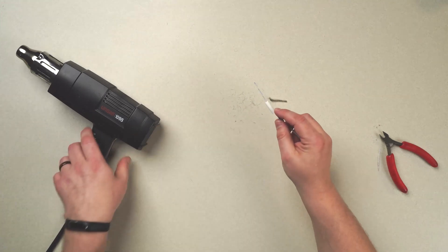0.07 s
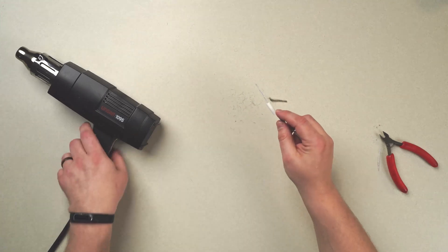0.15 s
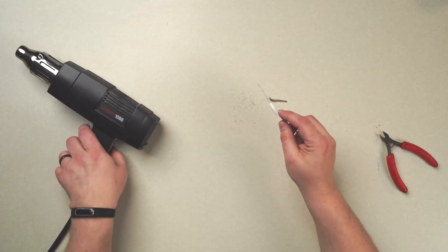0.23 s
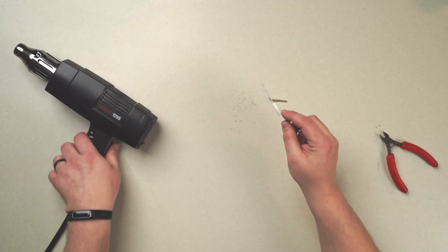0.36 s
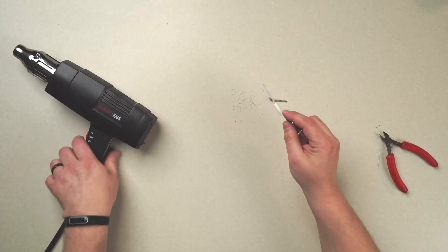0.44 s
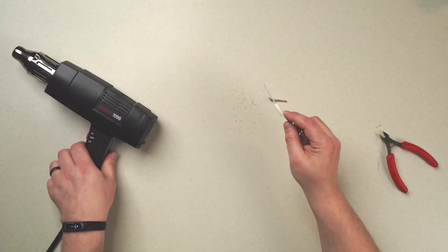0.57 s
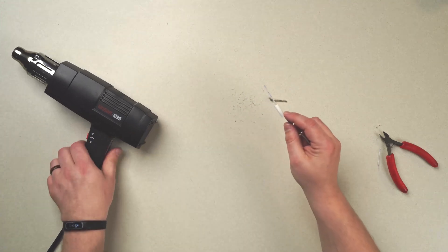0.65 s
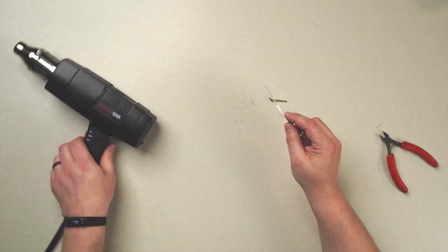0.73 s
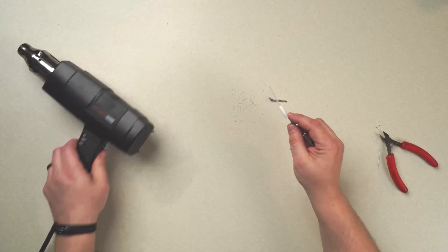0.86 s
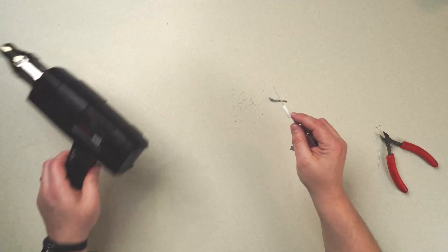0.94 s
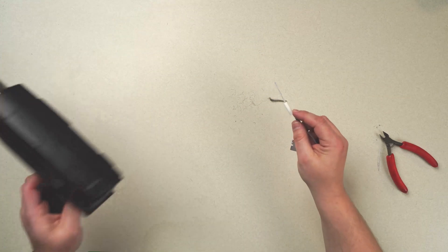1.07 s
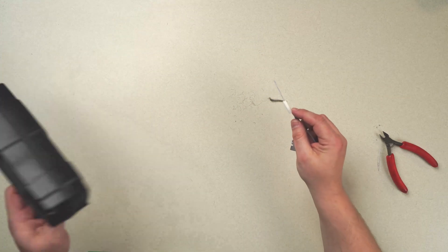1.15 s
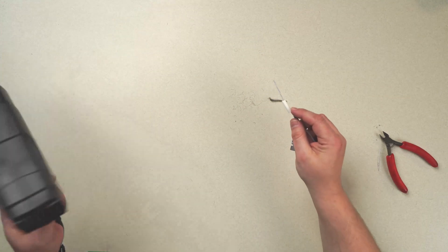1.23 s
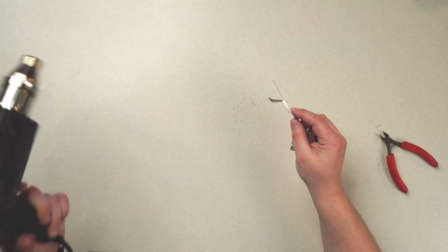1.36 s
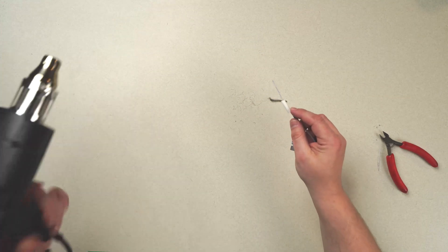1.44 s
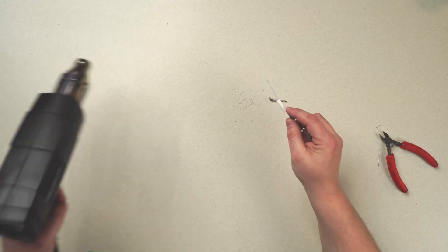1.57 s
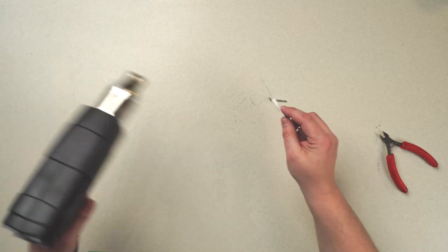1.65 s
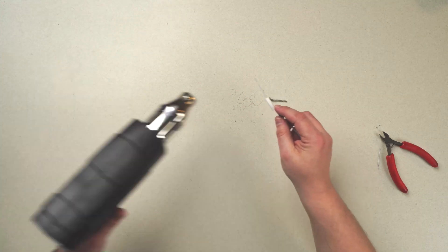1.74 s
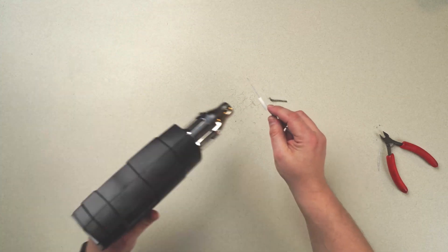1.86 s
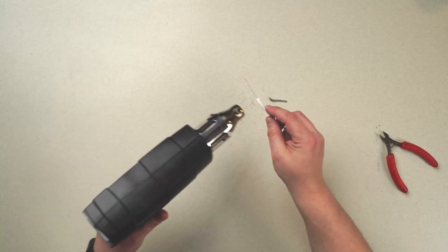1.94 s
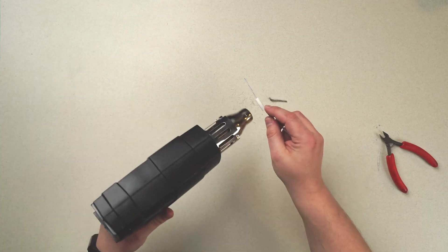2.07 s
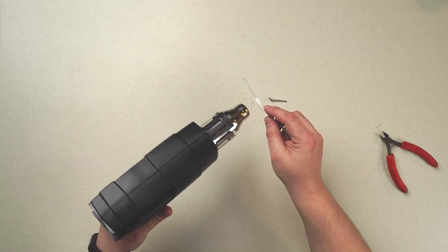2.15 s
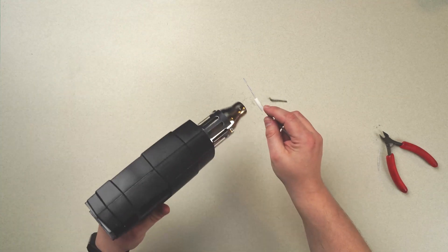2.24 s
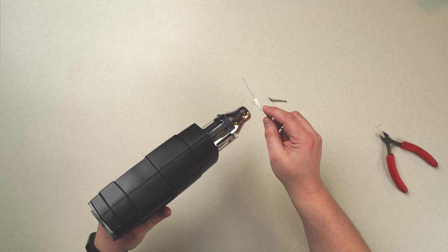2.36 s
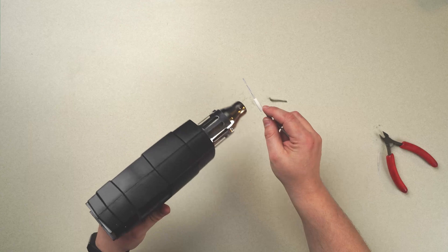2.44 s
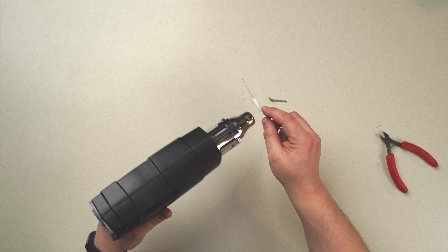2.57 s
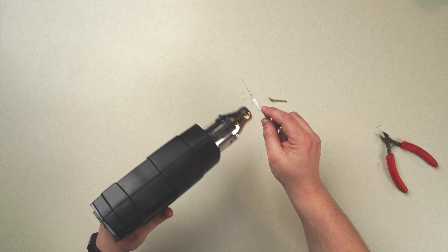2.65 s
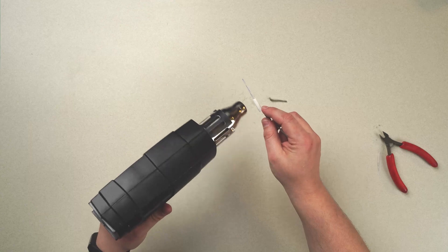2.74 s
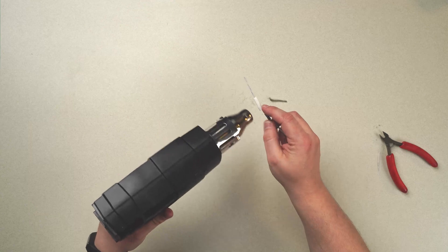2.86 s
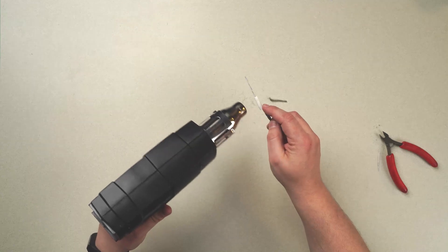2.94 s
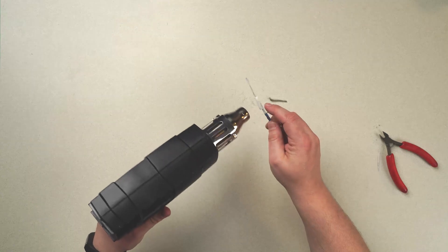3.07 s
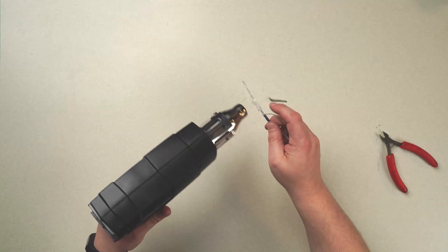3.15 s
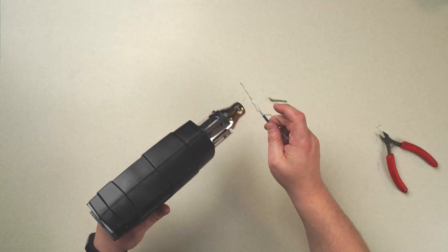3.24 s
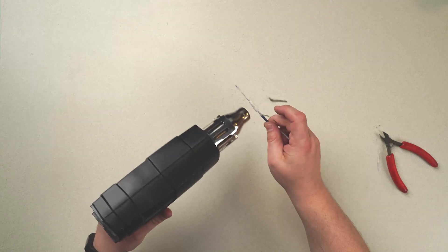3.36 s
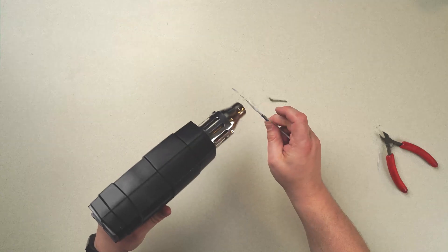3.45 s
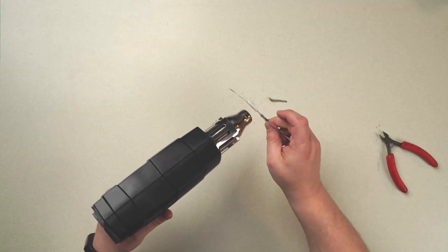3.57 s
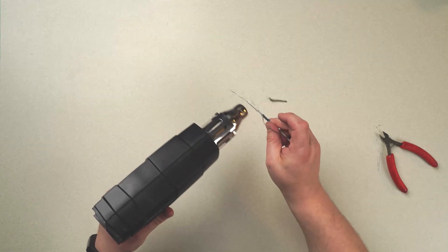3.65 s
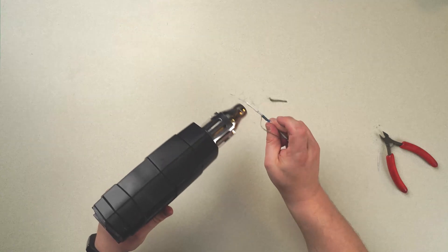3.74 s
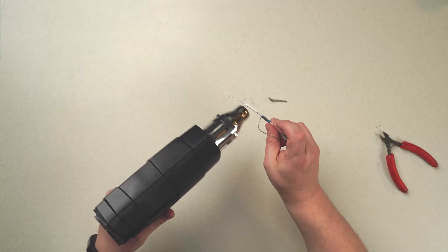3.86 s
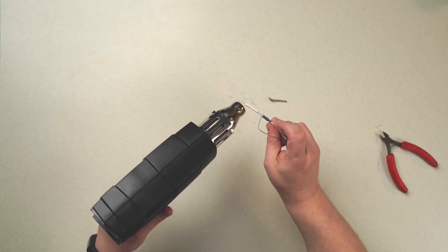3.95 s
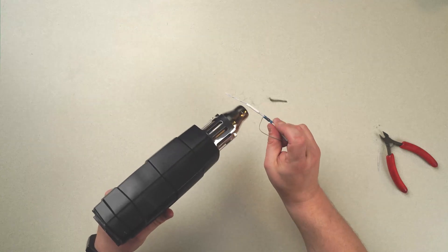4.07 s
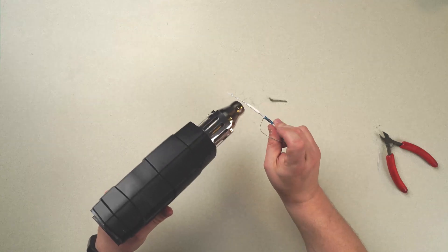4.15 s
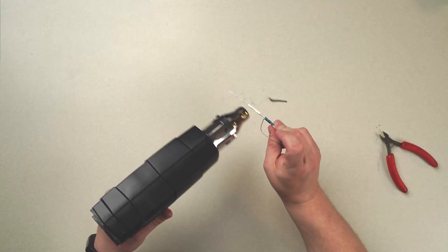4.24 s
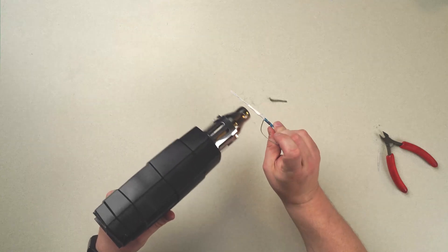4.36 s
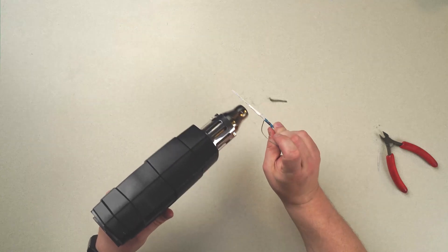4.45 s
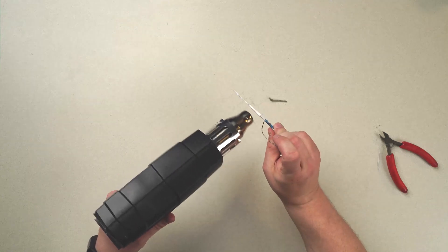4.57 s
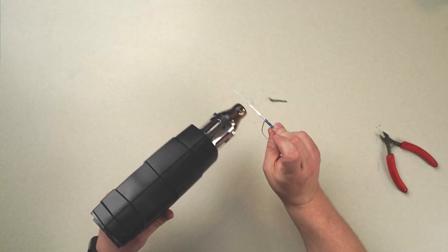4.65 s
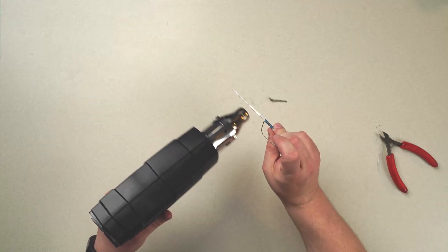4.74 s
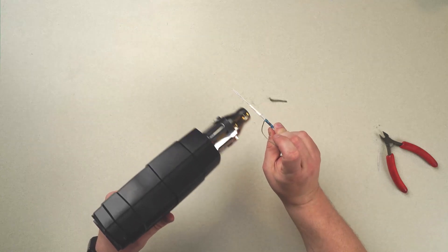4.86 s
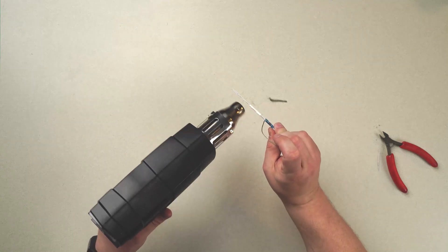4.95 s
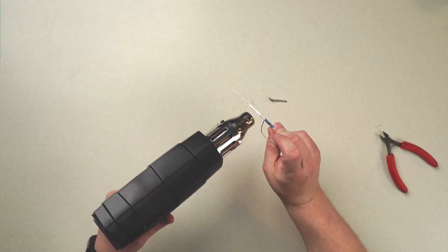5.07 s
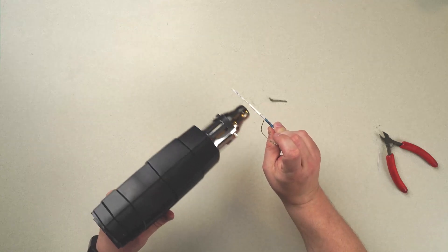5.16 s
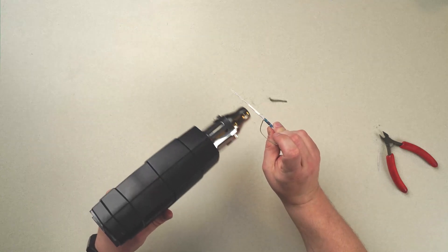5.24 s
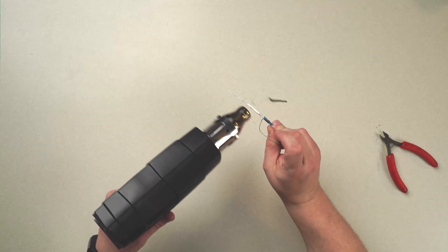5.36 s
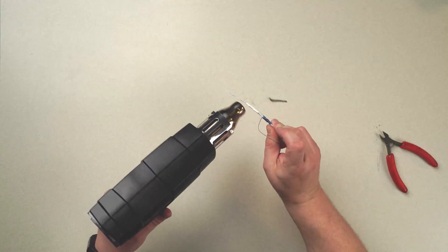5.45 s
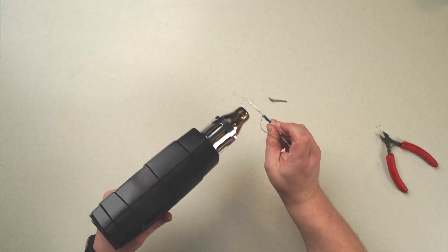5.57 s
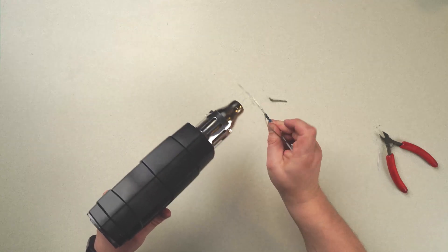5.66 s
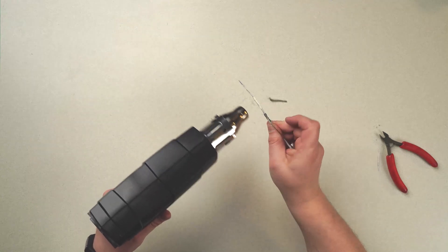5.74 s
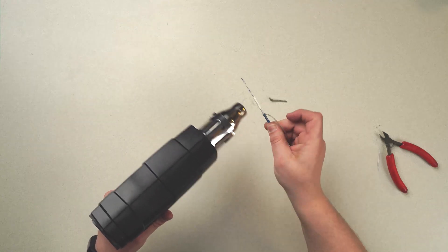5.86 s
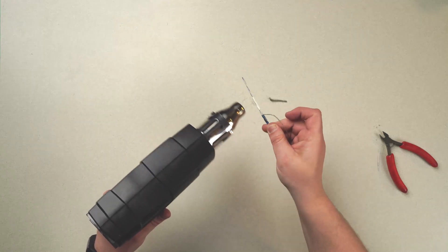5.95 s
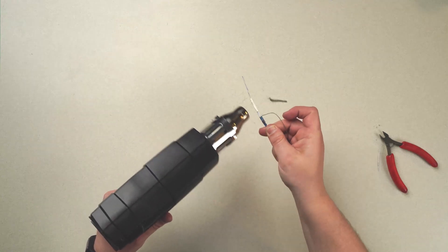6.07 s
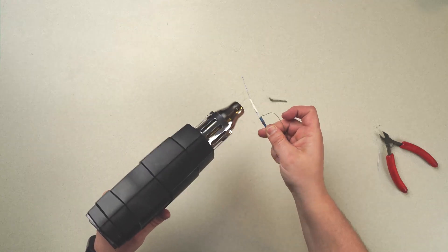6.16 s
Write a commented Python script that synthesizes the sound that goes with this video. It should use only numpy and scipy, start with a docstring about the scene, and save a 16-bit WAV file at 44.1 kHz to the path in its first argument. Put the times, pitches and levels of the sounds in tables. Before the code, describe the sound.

A heat gun is picked up with light plastic knocks, clicks on, and spins up to a steady whine with rushing air.

```python
"""An electric heat gun is picked up with a few knocks and switched on in a small, quiet workshop.
Its fan speeds up to a steady whine. On the way, the shaking rotor rattles the housing.
Air rushes through the vents and nozzle, the motor brushes hiss, and the jet briefly hits the microphone.
Under it all are the rustle of the hand, soft room noise and mains hum."""
import sys
import numpy as np
from scipy import signal
from scipy.fft import rfft, irfft
from scipy.io import wavfile
from scipy.ndimage import uniform_filter1d, map_coordinates

SR = 44100
rng = np.random.default_rng(int(sys.argv[2]) if len(sys.argv) > 2 else 0)


def generate_wav(sig):
    """Save sig (samples, or channels by samples) to the path in sys.argv[1] as 16-bit PCM at SR."""
    pcm = np.round(np.clip(np.atleast_2d(sig).T, -1, 1) * 32767).astype(np.int16)
    wavfile.write(sys.argv[1], SR, pcm)


N = 273861
T = np.arange(N) / SR
FREQ = np.maximum(np.arange(N // 2 + 1) * SR / N, 1)

# tone colour of the room noise: f/Hz, relative level/dB
ROOM_COLOUR = [(15, -34), (25, 1), (66, 5.5), (88, -20), (354, -4.5), (383, -11), (927, -50), (1310, -30),
               (1420, -52.5), (15000, -40)]
# tones of the mains hum: f/Hz, level/dB
HUM_TONES = [(60, -80.5), (120, -82.5)]
# tone colour of the rumbling bench: f/Hz, relative level/dB
RUMBLE_COLOUR = [(50, -38), (115, 5), (165, 6), (290, -7), (500, -27), (1500, -59)]
# tone colour of the rustling grip: f/Hz, relative level/dB
RUSTLE_COLOUR = [(200, 12.5), (550, 9), (1200, 6), (2200, -6.5), (4000, -8), (7000, -26), (15000, -36)]
# tone colour of skin swishing over plastic: f/Hz, relative level/dB
SWISH_COLOUR = [(1000, -20), (2400, 2), (4000, -2), (7000, -1), (12000, -1.5), (15500, -9)]
# soft bumps of hand and gun on the bench: t/s, level/dB
BENCH_BUMPS = [(.33, -51), (.497, -50), (.53, -51), (.568, -47), (.625, -52.5), (.8, -51)]
# slides of the hand over bench and grip: t/s, length/s, rustle level/dB, swish level/dB
HAND_SLIDES = [(0.324, .11, -64.5, -84), (0.495, 0.15, -67, -91), (.56, 0.042, -60.5, -81),
               (.79, .11, -63, -80), (.9, .4, -72, -76.5)]
# knocks and switch snaps: t/s, level/dB, centre f/Hz, width/octaves, fade time/s
CONTACTS = [(.151, -65, 4000, 2.1, 0.057), (0.215, -65.5, 2000, 2.1, 0.02), (.349, -55.5, 1090, 0.7, 0.038),
            (.357, -45.5, 1100, 1.56, 0.019), (.501, -59, 1100, .6, .025), (.521, -60, 1000, 0.75, .025),
            (.677, -59, 2390, 0.17, .012), (0.759, -33.5, 4500, 1.3, 0.0084),
            (0.7607, -36.5, 3400, 2.2, 0.017), (0.8471, -37.5, 1060, .28, 0.022),
            (.847, -53.5, 7000, 1.1, 0.039), (.868, -40.5, 5070, 0.35, 0.016),
            (0.87, -41.5, 3500, 2.6, .014), (.8798, -43.5, 3500, 2.2, 0.012), (.944, -59, 1800, 1.7, 0.018),
            (1.059, -57.5, 5500, 1.1, 0.02), (1.124, -54.5, 3280, 1.1, 0.09),
            (1.132, -44, 9000, 2.6, 0.029), (1.1422, -34, 3250, 0.84, 0.015),
            (1.149, -36.5, 940, 0.31, 0.02)]
# notes the plastic body rings at when knocked: f/Hz, relative level/dB, fade time/s
BODY_NOTES = [(620, -4, .035), (1093, -3, .035), (1600, -4, .035), (2950, -3, .035), (3500, -5, .03),
              (4050, 3, .025), (5254, -4, .022), (6503, -5, .022), (7607, -10, .02), (10030, -10, .02)]
# speeds at which the rotor shakes hardest: shaft f/Hz, width/Hz, level/dB, treble boost/dB
SHAKY_SPEEDS = [(194, 25, -35.5, -9), (259, 36, -35.5, 1.5), (320, 40, -38.5, 5), (375.4, 14, -32.5, 0)]
# resonances of the rattling housing: f/Hz, width/Hz, relative level/dB
HOUSING_PEAKS = [(755, 120, -6), (922, 117, 5.5), (1098, 55, 6.5), (1283, 130, 4.5), (1504, 68, -1),
                 (1824, 92, -2.5), (2310, 440, -14), (2900, 300, 4), (3400, 250, -14)]
# tone colour of the rushing air at full speed: f/Hz, relative level/dB
AIR_COLOUR = [(60, -46), (120, -25.5), (240, -12), (380, -5.5), (520, 0.8), (800, -2), (1200, -4),
              (1600, -7.5), (1900, -17.5), (2500, -9), (5300, -19.5), (8500, -14.5), (9800, -19.5),
              (13100, -19), (14000, -27), (14800, -25), (16000, -29)]
# resonances of the vents and nozzle: f/Hz, width/Hz, boost/dB
DUCT_PEAKS = [(993, 30, 5.9), (1117, 38, 7.3), (2607, 100, 6.3), (2768, 105, 7.8), (3230, 180, 5.8),
              (3776, 224, 2.2), (4230, 188, 10.3), (4729, 255, 8.6), (5095, 75, 8.2), (5840, 300, 12.2),
              (6035, 140, 14.0), (6830, 356, 7.0), (7694, 369, 2.4), (8091, 209, 4.6), (9023, 413, 3.6),
              (10452, 312, 6.4), (11432, 439, 9.4), (12517, 493, 6.7), (13068, 519, 6.1)]
# loudness of full-speed air as the gun is aimed: t/s, level/dB
AIR_LEVELS = [(1.5, -32), (2.7, -31), (5.2, -31), (5.7, -31.5), (6.1, -31.5)]
# tone colour of the hissing motor brushes: f/Hz, relative level/dB
BRUSH_COLOUR = [(2000, -6), (3600, 15), (5000, -19), (7000, 4), (8300, -28), (10300, -1), (11500, -1),
                (13800, 2), (15000, -14)]
# fan tones at full speed: multiple of the shaft speed, level/dB
FAN_TONES = [(1, -34), (2, -45), (3, -84), (4, -48), (5, -54.5), (8, -48), (10, -63), (12, -73), (16, -65),
             (17, -59)]
# tone colour of gusts on the microphone: f/Hz, relative level/dB
GUST_COLOUR = [(15, -7), (32, 8), (60, -7), (150, -18), (600, -61)]

ON_S, FULL_HZ = 1.148, 422  # switch-on time; shaft turns a second at full speed


def undb(db):
    """Turn decibels into a factor to multiply by."""
    return 10 ** (np.asarray(db) / 20)


def colour(points):
    """Join (Hz, dB) points into a gain for every frequency."""
    hz, db = np.transpose(points)
    return undb(np.interp(np.log(FREQ), np.log(hz), db))


def noise(gain):
    """Noise with the given tone colour and an average size (rms) of 1."""
    x = irfft(rfft(rng.standard_normal(N)) * gain, N)
    return x / np.sqrt(np.mean(x ** 2))


def wobble(rate):
    """A smooth random curve of size 1 that changes about rate times a second."""
    return noise(1 / (1 + (FREQ / rate) ** 2))


def resonance(f, hz, width):
    """How strongly something that rings at hz responds to f: a power of 1 at the peak."""
    return 1 / (1 + ((f / hz - hz / f) * hz / width) ** 2)


def swell(start, hold, rise, fall):
    """A loudness curve that reaches 1 at start, holds, then dies away; all times in seconds."""
    return np.exp(np.minimum(T - start, 0) / rise - np.maximum(T - start - hold, 0) / fall)


def fade(t, t60):
    """A loudness curve that drops by 60 dB in the fade time of t60 seconds."""
    return np.exp(-np.log(1000) * t / t60)


def background(room_db=-67.5):
    """Quiet room noise and the hum of mains power."""
    hum = sum(np.sqrt(2) * undb(db) * np.sin(2 * np.pi * hz * T) for hz, db in HUM_TONES)
    return noise(colour(ROOM_COLOUR)) * undb(room_db) + hum


def handling():
    """Bumps make the bench rumble; as the hand slides, the grip rustles and skin swishes on plastic."""
    rumble, rustle, swish = undb([-71, -71.5, -82.5])  # hand and cord are never quite still
    for start, db in BENCH_BUMPS:
        rumble = np.hypot(rumble, undb(db) * swell(start, hold=0, rise=.0075, fall=.011))
    for start, length, rustle_db, swish_db in HAND_SLIDES:
        motion = swell(start, length, rise=.011, fall=.021)
        rustle = np.hypot(rustle, undb(rustle_db) * motion)
        swish = np.hypot(swish, undb(swish_db) * motion)
    slips = undb(1.9 * wobble(90))
    bench = noise(colour(RUMBLE_COLOUR)) * rumble
    hand = noise(colour(RUSTLE_COLOUR)) * rustle + noise(colour(SWISH_COLOUR)) * swish
    return bench + hand * slips


def knocks(size=8192, lowest_hz=420, ring_db=-13):
    """Each contact is a short crack that sets the plastic ringing; each has its own brightness and spread."""
    out, t = np.zeros(N), T[:size]
    f = np.maximum(np.arange(size // 2 + 1) * SR / size, 1)
    lead = size // 32  # room for the filter to spread ahead of the hit
    for time, db, centre, octaves, t60 in CONTACTS:
        crack = rng.standard_normal(size) * fade(t, t60)
        detune = 1 + .014 * rng.standard_normal()  # the shifting hand retunes the body a little
        ring = sum(undb(note_db) * np.sin(2 * np.pi * (detune * hz * t + rng.random())) * fade(t, decay)
                   for hz, note_db, decay in BODY_NOTES)
        band = np.exp(-.5 * (np.log2(f / centre) / octaves) ** 2) / np.sqrt(f)
        band /= np.hypot(1, (lowest_hz / f) ** 3)  # the small body gives off little bass
        hit = np.roll(crack + undb(ring_db) * ring, lead)
        hit = irfft(rfft(hit) * band, size)
        hit /= np.sqrt(np.sum(hit ** 2) / (SR * t60 / np.log(1000)))  # longer hits carry more energy
        start = int(time * SR) - lead
        out[start:start + size] += undb(db) * hit
    return out


def workshop_echo(x, t60=.15, echo_db=-14, dull_hz=5000):
    """Sound bounces off bench and walls, adding a short, duller tail."""
    tail = noise(1 / np.hypot(1, FREQ / dull_hz)) * fade(T, t60) * (T > .004)
    tail /= np.sqrt(np.sum(tail ** 2))
    return x + undb(echo_db) * signal.fftconvolve(x, tail)[:N]


def shaft_speed(target_hz=428.8, run_up_s=.271, fan_drag=.81, sag_hz_per_s=2.26):
    """The motor speeds up until drag matches its push, then slows a little as it warms."""
    age = np.maximum(T - ON_S, 0)
    spare_push = np.exp(-age / run_up_s)
    limit_hz = target_hz - sag_hz_per_s * age
    return np.maximum(limit_hz * (1 - spare_push) / (1 + fan_drag * spare_push), 1)


def rotor_shake(hz, base_db=-56, set_in_hz=71):
    """The rotor shakes a little at any speed, and much more as it passes a shaky one."""
    peak_power = sum(undb(db) ** 2 * resonance(hz, f, width) ** 2 for f, width, db, _ in SHAKY_SPEEDS)
    base = undb(base_db) * np.minimum(hz / set_in_hz, 1)
    return np.sqrt(peak_power + base ** 2)


def rattle(hz, turns, uneven_db=2.2, boost_db=7, treble_hz=2000):
    """The rotor knocks once a turn; its overtones swell as they sweep through the housing's resonances."""
    speeds, _, _, treble_boosts = np.transpose(SHAKY_SPEEDS)
    treble_db = np.interp(hz, speeds, treble_boosts)
    out = 0
    for k in range(2, 18):
        ring_power = sum(undb(db) ** 2 * resonance(k * hz, f, width) ** 2
                         for f, width, db in HOUSING_PEAKS)
        push_db = boost_db * (3 <= k <= 6) + uneven_db * wobble(33)
        push_db += treble_db / (1 + (treble_hz / (k * hz)) ** 8)
        cycles = k * turns + rng.random() + .024 * wobble(60)
        out += np.sqrt(ring_power) * undb(push_db) * np.sin(2 * np.pi * cycles)
    # even out the loudness so that the shaking alone sets it
    power = uniform_filter1d(out ** 2, size=4096)
    return out / np.sqrt(np.abs(power) + 1e-6) * rotor_shake(hz)


def rushing_air(hz, cold_drop=.06, warm_s=.6, flicker_db=.75, drift_db=.1, surge_db=.39):
    """Swirling air rings the vents and nozzle; the treble needs the most fan speed to come up."""
    boost = 1 + sum((undb(db) ** 2 - 1) * resonance(FREQ, f, width) ** 1.43
                    for f, width, db in DUCT_PEAKS)
    rush = noise(colour(AIR_COLOUR) * np.sqrt(boost))
    # sound travels faster as the air heats, so the resonances start low and rise
    pitch = 1 - cold_drop * np.exp(-np.maximum(T - ON_S, 0) / warm_s)
    spectrum = rfft(map_coordinates(rush, [np.cumsum(pitch)], order=5, mode="wrap"))
    centres = np.geomspace(300, 12000, 6)
    out = 0
    for centre, share in zip(centres, np.eye(len(centres))):
        band = irfft(spectrum * np.interp(np.log(FREQ), np.log(centres), share), N)
        growth = np.interp(centre, [300, 1200, 7000], [2.6, 1.3, 4.3])
        flicker = undb(flicker_db * wobble(13) + drift_db * wobble(.8))
        out += band * (hz / FULL_HZ) ** growth * flicker
    aim_db = np.interp(T, *np.transpose(AIR_LEVELS))
    return out * undb(aim_db + surge_db * wobble(.65))


def brushes(hz, turns, hiss_db=-57, chatter_db=5, set_in_hz=200):
    """The brushes scrape the motor's spinning contacts and skip at the first shaky speed."""
    scrape = 1 + .5 * np.sin(2 * np.pi * turns)  # harder on one side of each turn
    shaky_hz, width, _, _ = SHAKY_SPEEDS[0]
    level = undb(hiss_db + chatter_db * resonance(hz, shaky_hz, width))
    fade_in = np.minimum(hz / set_in_hz, 1) ** 3
    return noise(colour(BRUSH_COLOUR)) * scrape * level * fade_in


def fan_whine(hz, turns):
    """Tones follow the shaft and grow with its speed; swirling air shakes the upper ones most."""
    out = 0
    for k, db in FAN_TONES:
        growth, waver_db, jitter = (4.2, 1, 0) if k == 1 else (3, 1.74, .025)
        level = np.sqrt(2) * undb(db + waver_db * wobble(11)) * (hz / FULL_HZ) ** growth
        cycles = k * turns + rng.random() + jitter * wobble(11)
        out += level * np.sin(2 * np.pi * cycles)
    return out


def draught(level_db=-60, gust_db=4.5):
    """The jet swings past the microphone and hits it with low, gusty thumps."""
    passing = swell(start=1.51, hold=.36, rise=.07, fall=.13)
    return noise(colour(GUST_COLOUR)) * passing * undb(level_db + gust_db * wobble(6))


def scene(speed_wander=.000693):
    """One shaft speed drives the whine, rattle, brushes and air; both channels are the same."""
    hz = shaft_speed() * (1 + speed_wander * wobble(3.07))
    turns = np.cumsum(hz) / SR
    gun = fan_whine(hz, turns) + rattle(hz, turns) + brushes(hz, turns) + rushing_air(hz)
    mono = gun * (T > ON_S) + draught() + workshop_echo(knocks()) + handling() + background()
    return np.array([mono, mono])


def record(dry):
    """A steep filter cuts the treble above 15750 Hz."""
    return signal.sosfilt(signal.ellip(12, .1, 80, 15750, fs=SR, output="sos"), dry)


dry = scene()
out = record(dry)
generate_wav(out)
```